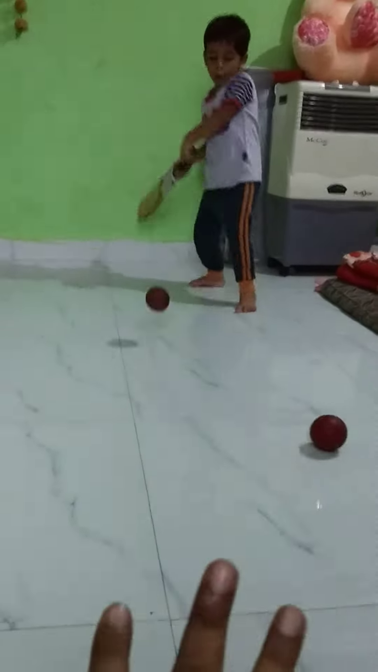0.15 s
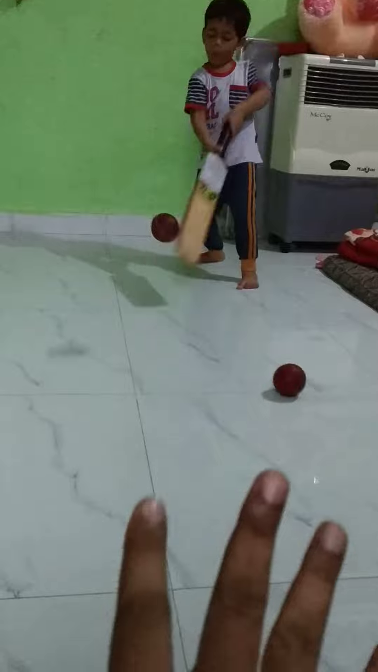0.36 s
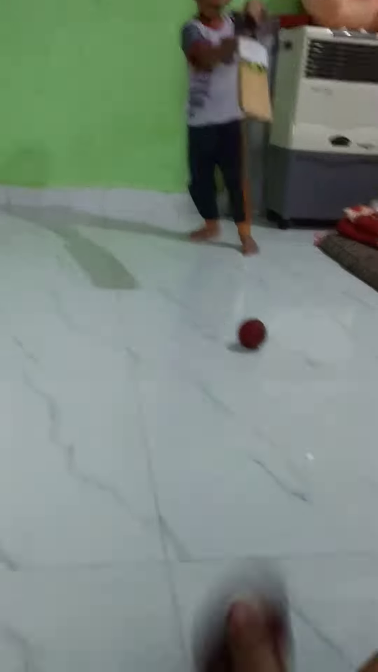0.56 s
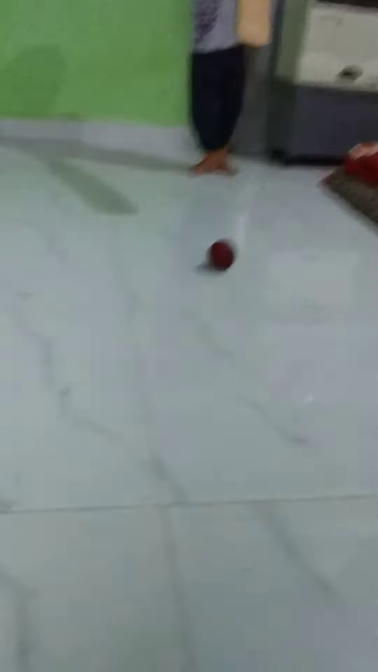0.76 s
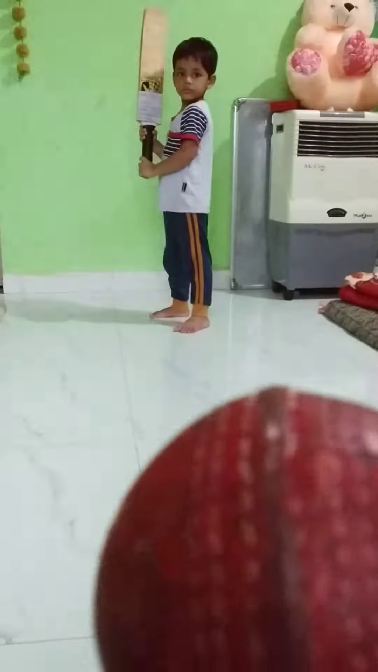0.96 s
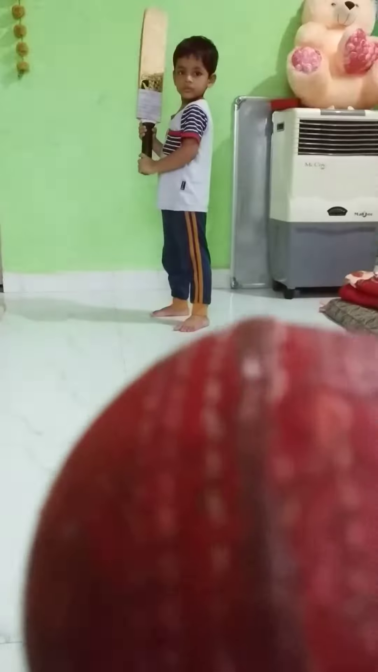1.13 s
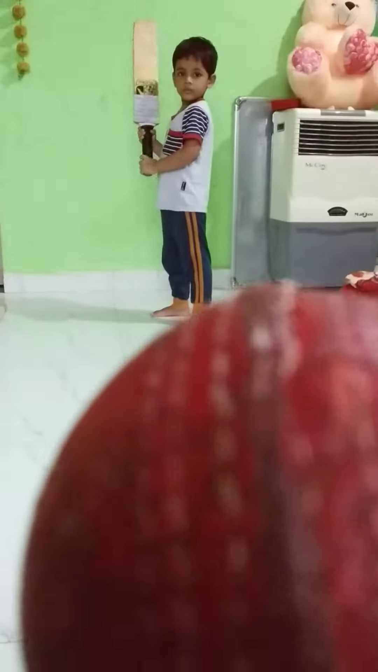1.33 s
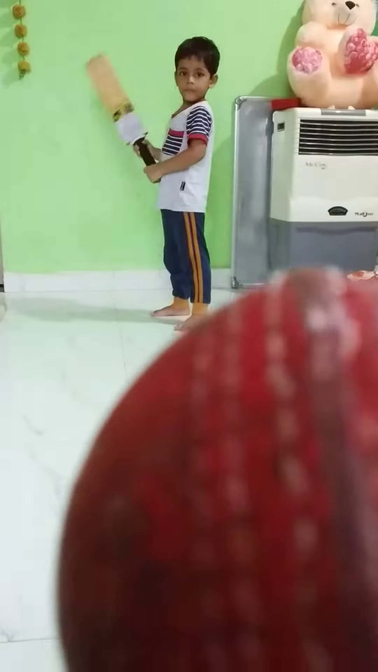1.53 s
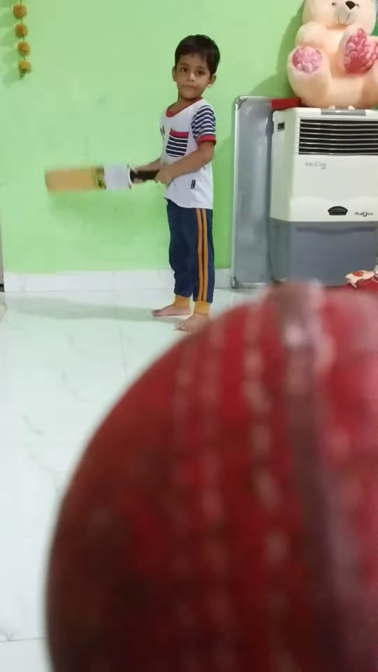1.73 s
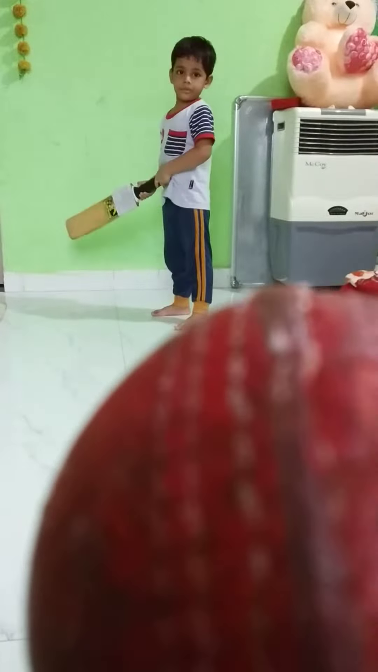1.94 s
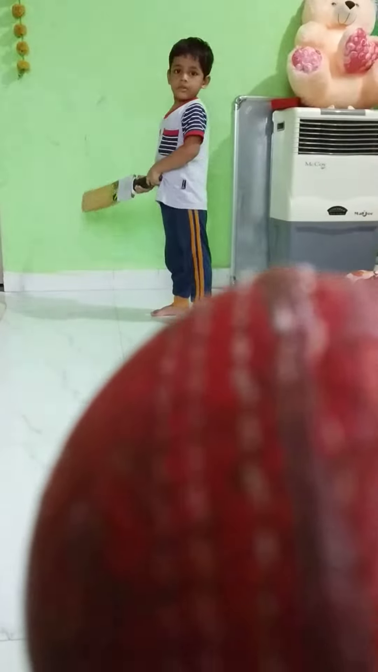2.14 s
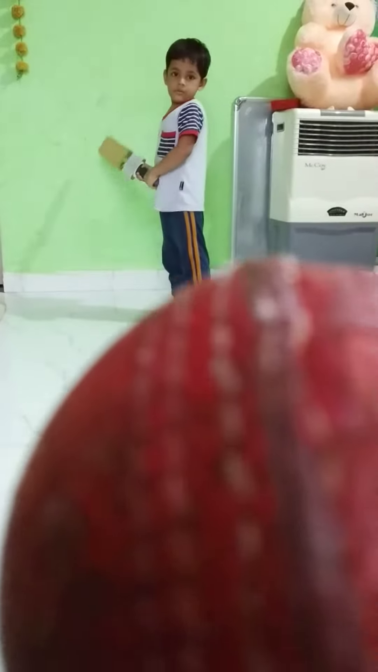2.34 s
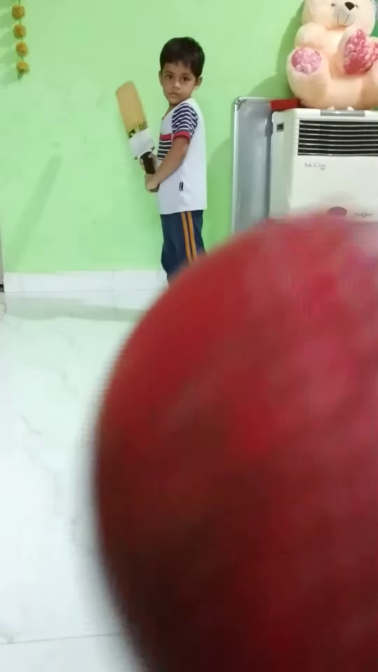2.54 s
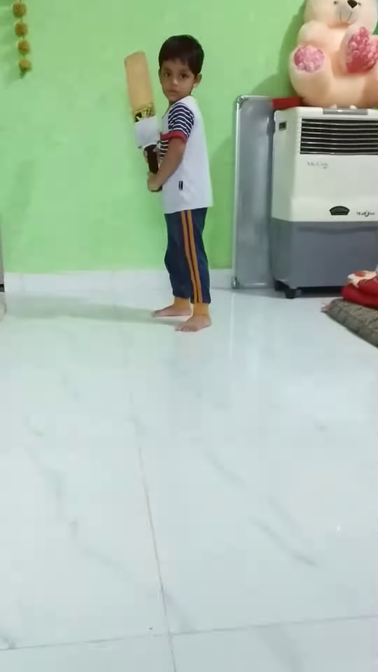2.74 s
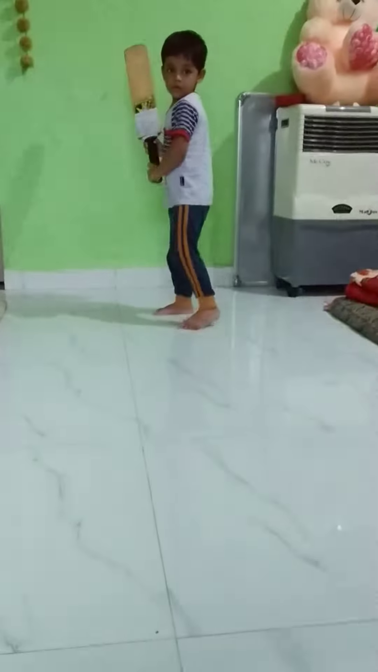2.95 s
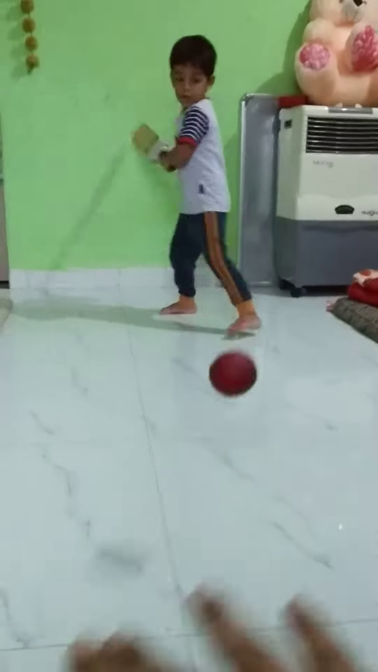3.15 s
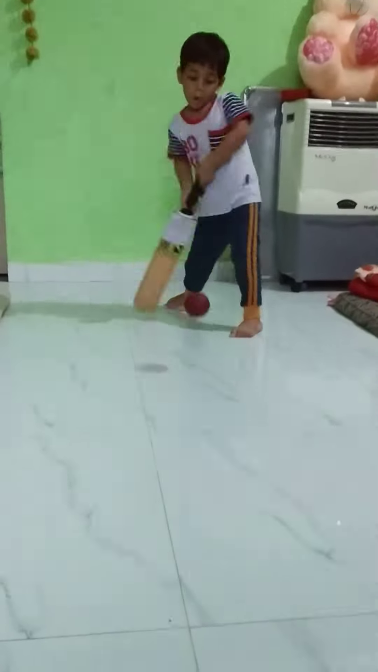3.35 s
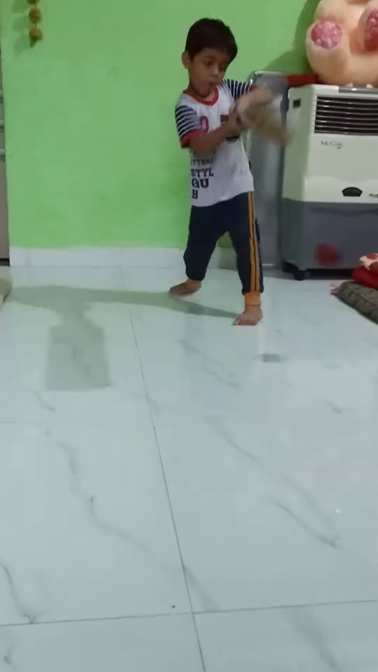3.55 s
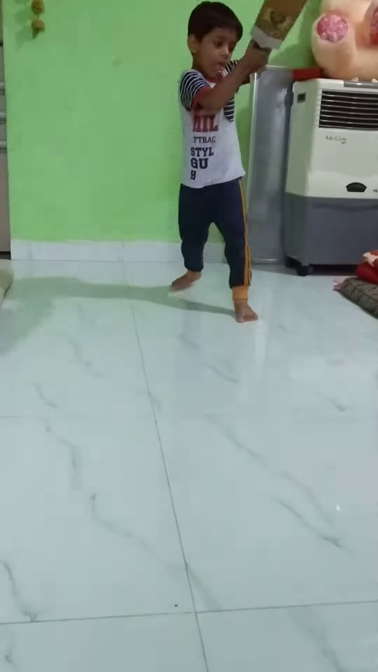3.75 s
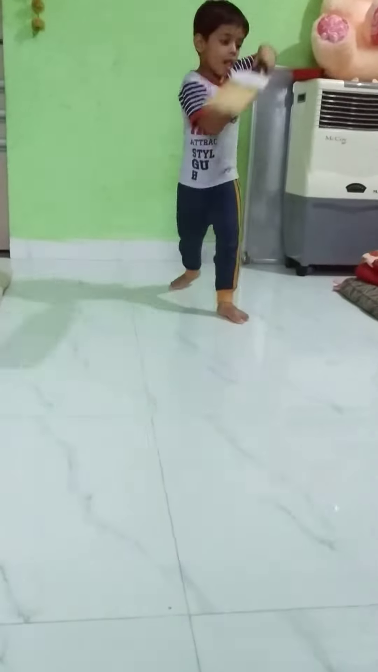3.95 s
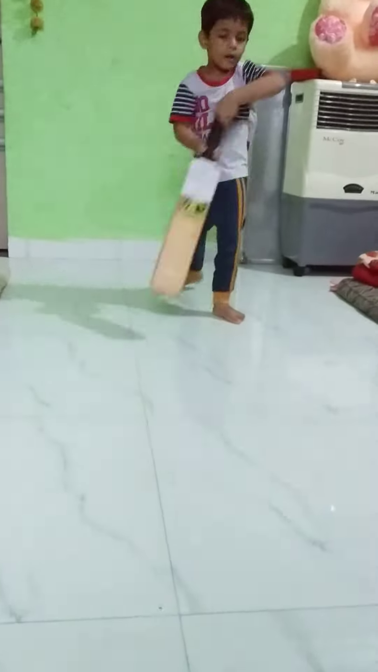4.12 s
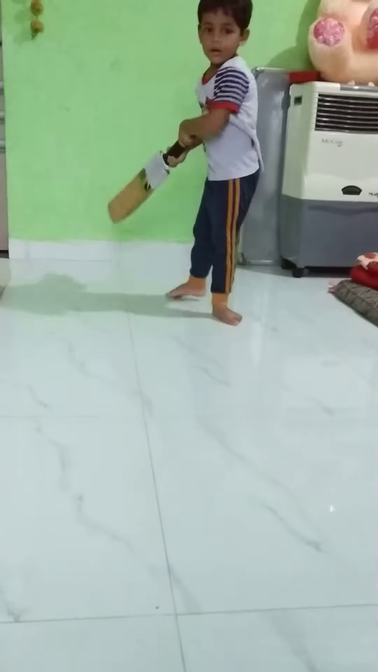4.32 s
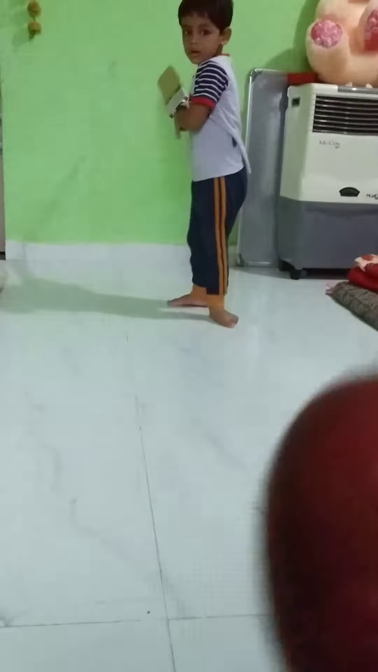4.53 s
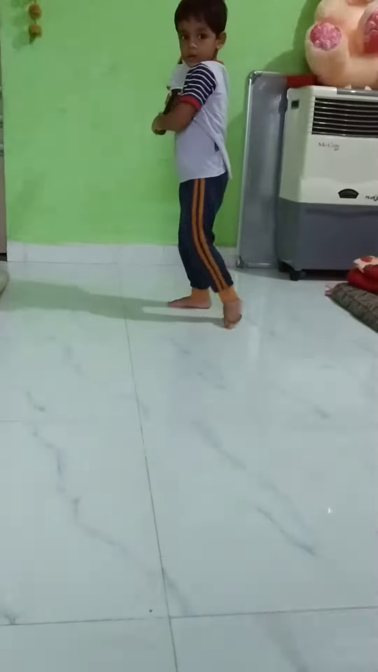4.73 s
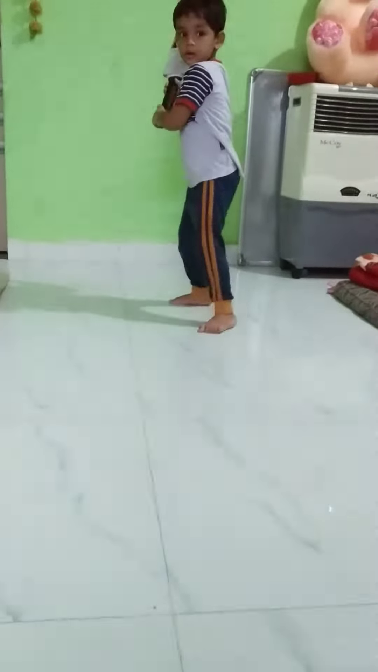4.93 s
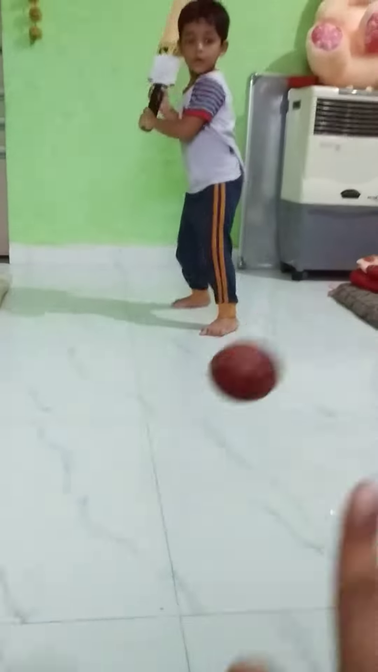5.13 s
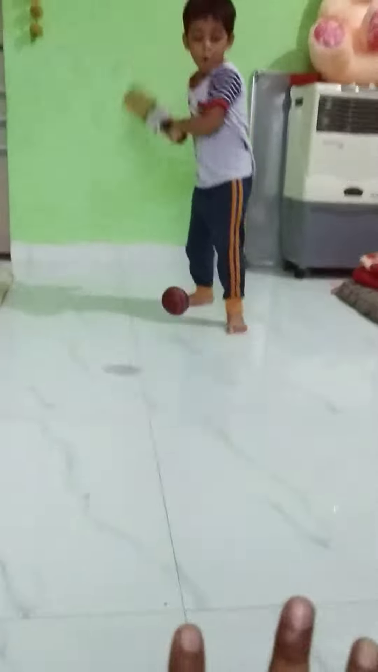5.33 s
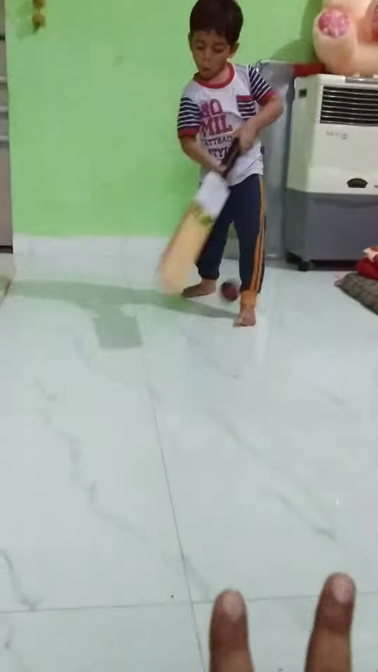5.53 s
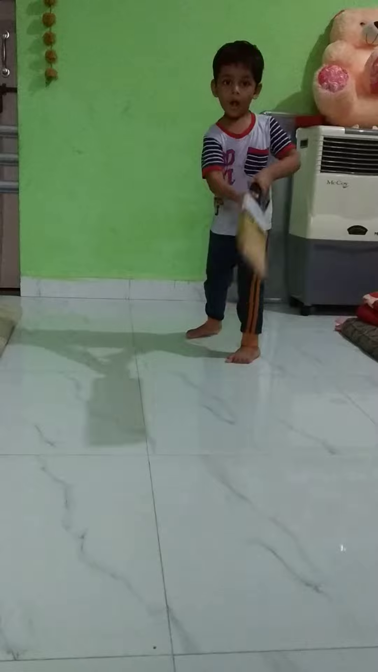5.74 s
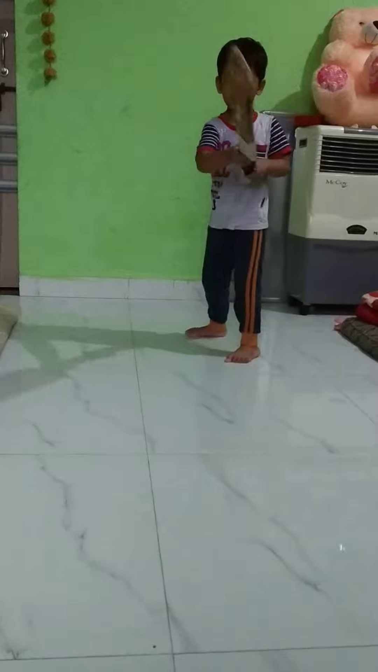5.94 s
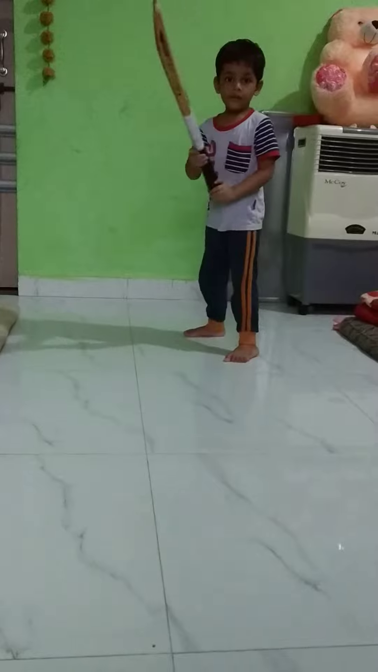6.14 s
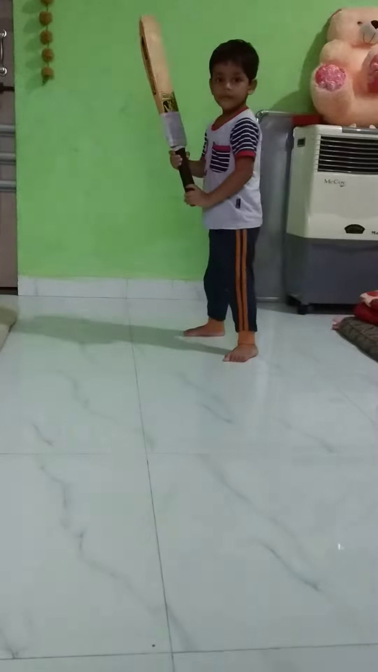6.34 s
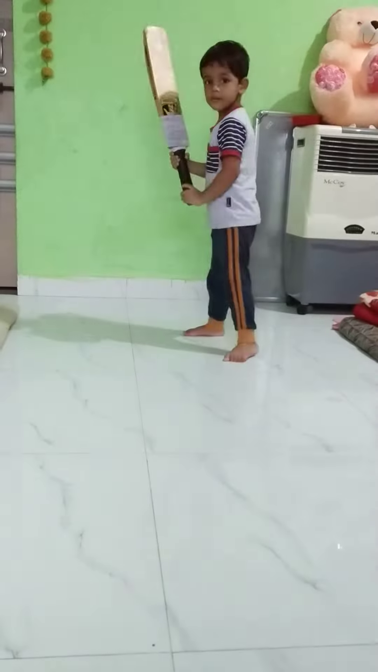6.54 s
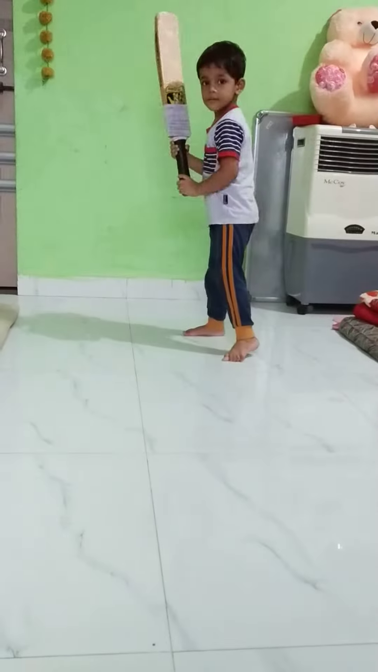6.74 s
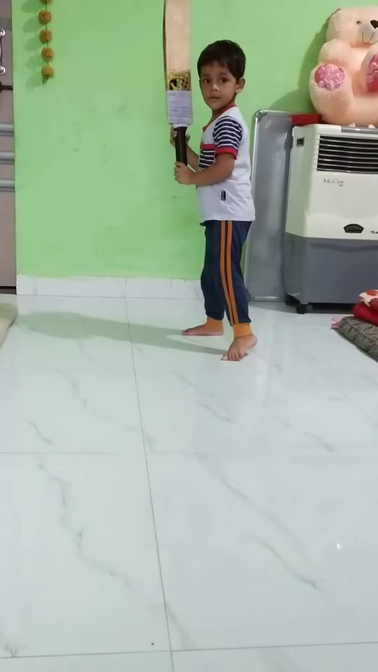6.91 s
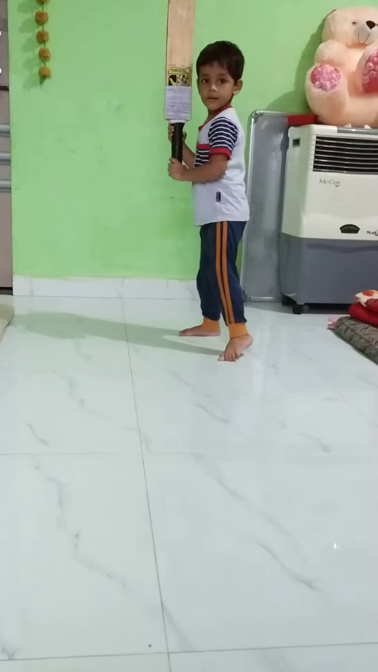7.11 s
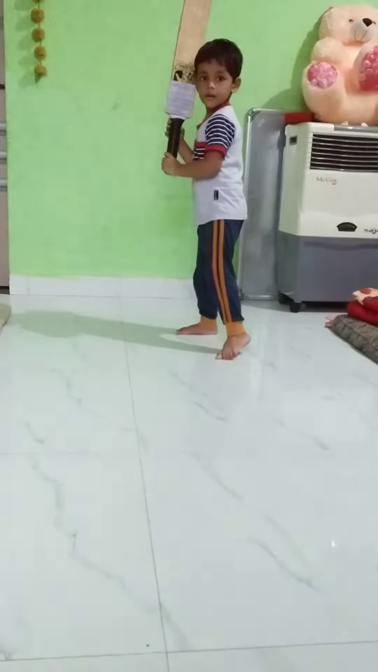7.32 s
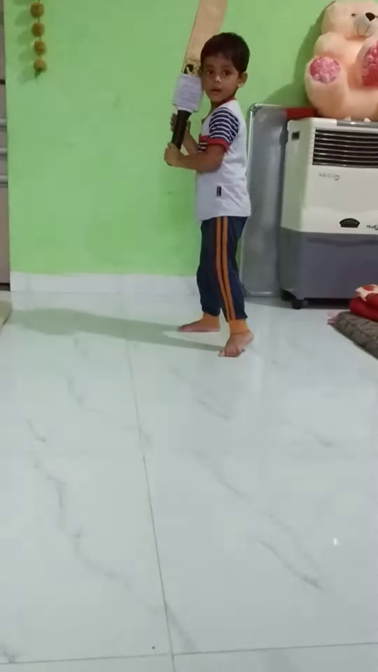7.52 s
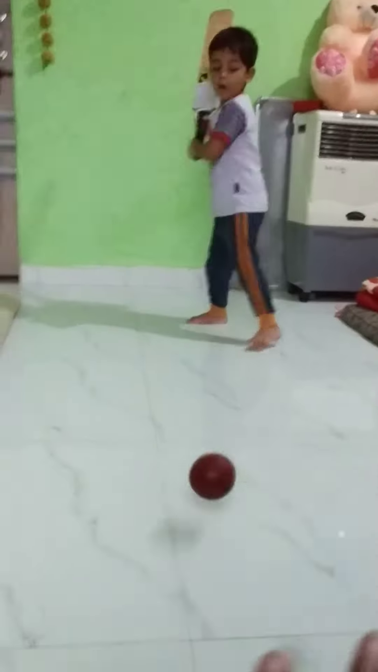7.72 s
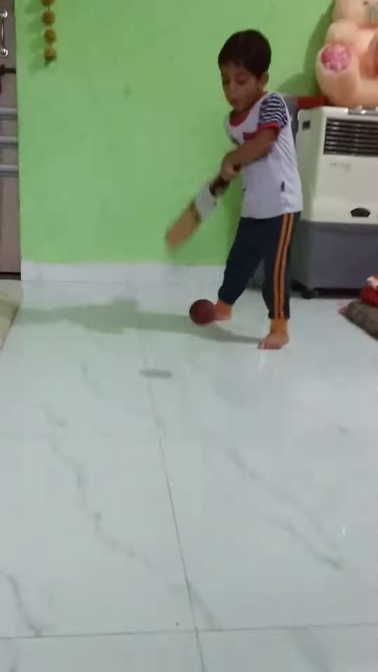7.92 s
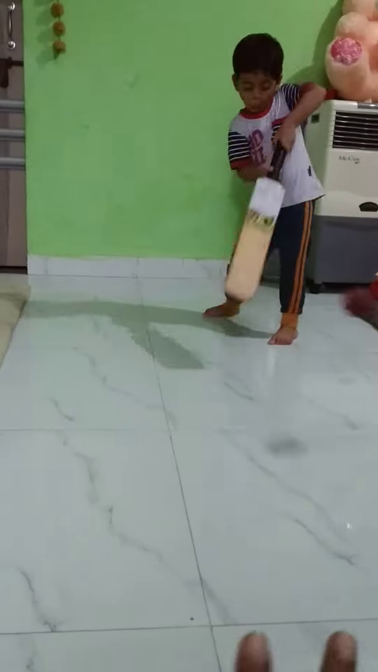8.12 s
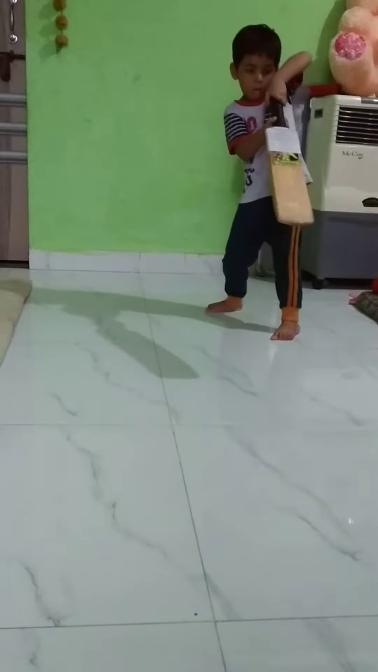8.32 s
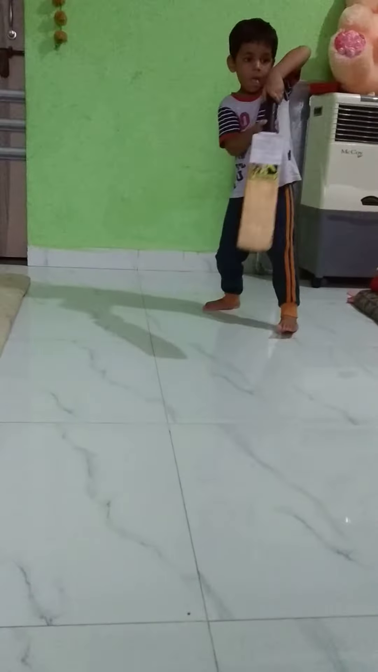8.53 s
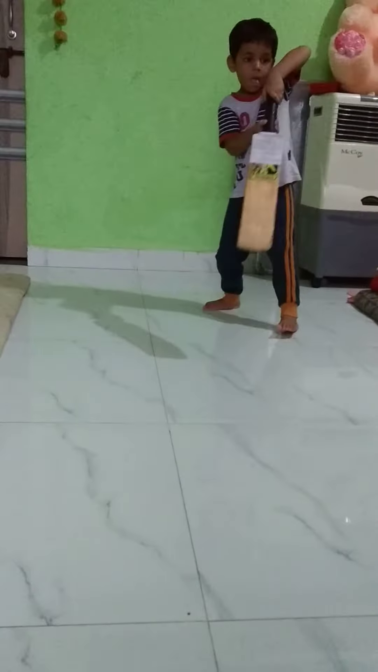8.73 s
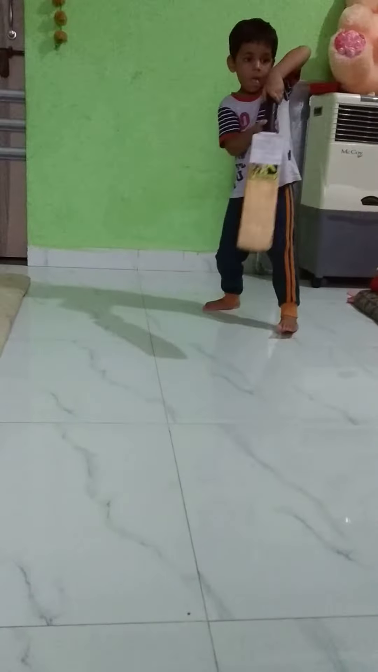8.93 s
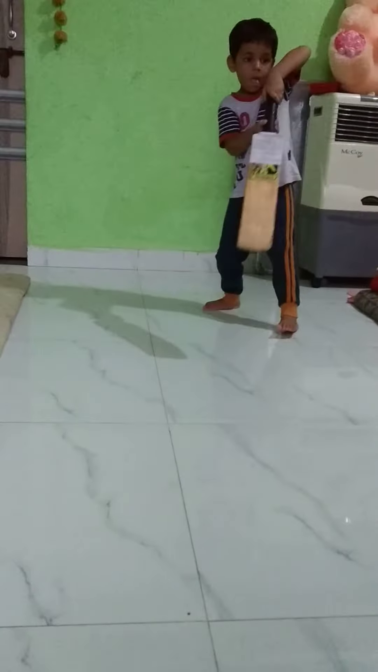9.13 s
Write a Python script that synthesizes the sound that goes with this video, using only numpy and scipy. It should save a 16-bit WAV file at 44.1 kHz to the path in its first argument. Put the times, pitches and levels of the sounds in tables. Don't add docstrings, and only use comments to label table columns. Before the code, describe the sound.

A hard leather ball knocks hollowly on a tiled floor and cracks off a wooden bat, then slams a door, over fan hum.

```python
import sys
import numpy as np
from scipy import signal
from scipy.io import wavfile

SR = 44100
rng = np.random.default_rng(int(sys.argv[2]) if len(sys.argv) > 2 else 0)


def nominal_scale(level):
    x = np.asarray(level, float) / 20
    return 10 ** x


def store_wav(level_fs):
    pcm = np.round(np.clip(np.atleast_2d(level_fs), -1, 1) * 32767)
    wavfile.write(sys.argv[1], SR, pcm.T.astype(np.int16))


N = 408807

# frequency in Hz, level in dB re blow, t60 in seconds.
SLAB_MODES = [(65.7, -18, 0.46), (108, -70, 0.97)]
# frequency in Hz, width in Hz, level in dB.
TILE_RESONANCES = [(1620, 337, -16.5), (2370, 2020, -1.5), (4720, 1200, -11.5)]


def rms_one(x):
    return x / np.sqrt(np.mean(x ** 2) + 1e-20)


def at_hz(points, hz):
    table_hz, value = np.array(points)[:, :2].T
    return np.interp(np.log(hz), np.log(table_hz), value)


def drift(rate):
    step = 40
    r = np.exp(-2 * np.pi * rate * step / SR)
    white = rng.standard_normal(N // step + 2002)
    slow = signal.lfilter([1], [1, -2 * r, r * r], white)[2000:]
    return np.interp(np.arange(N) / step, np.arange(len(slow)), rms_one(slow))


def ring(push, hz, t60):
    r = nominal_scale(-60 / (t60 * SR))
    w = 2 * np.pi * hz / SR
    return signal.lfilter([0, np.sin(w)], [1, -2 * r * np.cos(w), r * r], push + 1e-18)


def lift(x, hz, width_hz, db):
    r = np.exp(-np.pi * width_hz / SR)
    poles = [1, -2 * r * np.cos(2 * np.pi * hz / SR), r * r]
    return x + nominal_scale(db) * signal.lfilter([(1 - r * r) / 2, 0, (r * r - 1) / 2], poles, x)


def bandpass(order, low, high, x):
    return signal.sosfilt(signal.butter(order, [low, high], "band", fs=SR, output="sos"), x)


def highpass(hz, x):
    return signal.sosfilt(signal.butter(2, hz, "high", fs=SR, output="sos"), x)


def stereo_bands(size):
    # frequency in Hz, left-right correlation.
    likeness = [(26, 0.59), (75, 1), (290, 0.9), (640, -0.23), (1410, 0.18), (3100, -0.3), (6820, 0.23),
                (15000, -0.2)]
    # frequency in Hz, left minus right in dB.
    left_lift = [(60, 1.5), (200, -0.5), (380, 2), (700, 0), (2380, 2), (4400, -2.5), (8120, 6.5),
                 (15000, 13)]
    edges_hz = 20 * 2 ** np.arange(0, 9.8, .5)
    white = rng.standard_normal((2, 2, size))
    for k, (low, high) in enumerate(zip(edges_hz, edges_hz[1:])):
        mid, side = bandpass(2, low, high, white[k % 2])
        hz = np.sqrt(low * high)
        alike = np.clip(at_hz(likeness, hz), -1, 1)
        lean = nominal_scale(at_hz(left_lift, hz) / 2 * np.array([[1], [-1]]))
        yield hz, lean * (np.sqrt(1 + alike) * mid + np.sqrt(1 - alike) * side * [[1], [-1]])


def fan():
    # frequency in Hz, spectral density in dB per Hz.
    spectrum = [(25, -0.5), (68, 1), (120, -22), (300, -7.5), (560, -15.5), (1700, -18.5), (5000, -26.5),
                (14000, -34.5)]
    fan_db, flicker_db = -35.5, .9
    air = 0
    for hz, band in stereo_bands(size=N):
        air = air + nominal_scale(at_hz(spectrum, hz) + flicker_db * drift(14)) * band
    return nominal_scale(fan_db) * rms_one(air)


def draught():
    # middle in seconds, half length in seconds, level in dB.
    gusts = [
        (0.15, 0.8, -28.5),
        (1.543, 0.28, -37),
        (2.83, 0.092, -24),
        (3.264, 0.21, -26),
        (3.774, 0.039, -26.5),
        (4.844, 0.052, -32.5),
        (5.394, 0.32, -28),
        (6.3, 0.46, -36),
        (7.644, 0.45, -50),
        (8.64, 0.21, -16.5),
    ]
    t = np.arange(N) / SR
    gain = nominal_scale(-43.5)
    for s, half, db in gusts:
        gain = gain + nominal_scale(db) * np.exp(-((t - s) / half) ** 2)
    shared, left, right = rng.standard_normal((3, N))
    low = bandpass(2, 22, 105, [shared + 2.4 * left, shared + 1.7 * right])
    return gain * nominal_scale(-7.0 + 1.6 * drift(23)) * rms_one(low)


def contact(hz, ring_hz, slap_hz, slap_db, crack_db, knock_t60, ring_db, dull, body, surface):
    click = (np.arange(SR // 8) == 0) * -1.0
    push = ring(click, 1.267 * hz, 0.011)
    knock = ring(push, hz, knock_t60)
    knock += nominal_scale(9.0) * ring(push, 1.34 * hz, knock_t60 * 0.24)
    knock += nominal_scale(-3.0) * ring(push, 2.24 * hz, knock_t60 * 0.36)
    slap = bandpass(4, 0.45 * slap_hz, 1.63 * slap_hz, click)
    slap = slap / np.abs(slap).max()
    for f, width_hz, db in body:
        slap = lift(slap, f, width_hz, db)
    crack = highpass(1300, click)
    crack = signal.lfilter([1 - dull], [1, -dull], crack)
    for f, width_hz, db in surface:
        crack = lift(crack, f, width_hz, db)
    whole = knock / np.abs(knock).max() - nominal_scale(ring_db) * ring(click, ring_hz, 0.013)
    whole += nominal_scale(slap_db + 2.5) * slap + nominal_scale(crack_db + 21.5) * crack
    return highpass(.47 * hz, whole)


def blows(table, bands, knock_t60, slap_hz, force_db, wet_db, ring_db, snap_db, dull=0.64,
          panel=(), body=(), surface=TILE_RESONANCES, firm_db=-10):
    # frequency in Hz, t60 in seconds.
    room_decay = [(60, 0.13), (150, 0.4), (300, 0.24), (700, 0.26), (1500, 0.27), (4000, 0.26),
                  (9000, 0.28), (14000, 0.29)]
    delay_s, first_echo_s = .002, 0.0013
    room_db, early_db, early_s = -3, 1.5, 0.019
    wall_s, wall_db = 0.01, -9
    bunch_db, bunch_fade_s, bunches_per_s = 2.5, .03, 110
    brighter_oct_per_db = .08
    port_lag = 5
    size = SR * 3 // 4
    t = np.arange(size) / SR
    out = np.zeros((2, N + 2 * size))
    build = 1 - np.exp(-(t / first_echo_s) ** 2)
    decays = [build * nominal_scale(-60 * t / at_hz(room_decay, hz)) for hz, band in bands]
    bunches = drift(bunches_per_s)
    for s, knock_db, hz, slap_db, crack_db in table:
        skip = rng.integers(size)
        part = slice(skip, skip + size)
        noise = sum(band[:, part] for f, band in bands[-6:])
        echoes = sum(band[:, part] * d for (f, band), d in zip(bands, decays))
        echoes *= nominal_scale(bunch_db * bunches[part] * np.exp(-t / bunch_fade_s))
        echoes *= nominal_scale(room_db + wet_db - 32.5 + early_db * np.exp(-t / early_s))
        echoes[:, round(wall_s * SR * rng.uniform(.9, 1.1))] += nominal_scale(wall_db)
        echoes[0, 0] += 1
        echoes[1, port_lag:port_lag + 3] += [.3, .4, .3]
        octaves = brighter_oct_per_db * np.clip(slap_db - firm_db, -6, 14)
        direct = contact(hz, slap_hz, slap_hz * 2 ** octaves, slap_db, crack_db,
                         knock_t60, ring_db, np.clip(dull, 0, .9), body, surface)
        heard = signal.fftconvolve(echoes, direct[None], axes=1)[:, :size]
        heard += nominal_scale(crack_db + snap_db - 60 * t / 0.021) * noise
        for f, db, t60 in panel:
            heard += nominal_scale(db) * ring((t == 0) * -1.0, f, t60)
        at = round((s + delay_s) * SR)
        out[:, at:at + size] += nominal_scale(knock_db + force_db) * heard
    return out[:, :N]


def ticks(bands):
    # start in seconds, knock in dB, knock pitch in Hz, slap and crack in dB re knock.
    touches = [
        (0.552, -27, 412, -29, 6.5),
        (3.187, -30, 297, 0, -6),
        (4.982, -39, 368, -15, -3),
    ]
    # frequency in Hz, width in Hz, level in dB.
    seam = [(2100, 450, 11), (4250, 450, 12), (7700, 700, 12)]
    return blows(touches, bands, 0.023, slap_hz=1600, force_db=-5.0, wet_db=8.5, ring_db=-25,
                 snap_db=12.0, surface=seam)


def door_slam(bands):
    # start in seconds, knock in dB, knock pitch in Hz, slap and crack in dB re knock.
    hits = [
        (8.423, 0, 149, -9, -6),
        (8.443, -20, 183, 1, -1),
        (8.463, -12.5, 98, 2, -0.5),
        (8.490, -9, 132, -2.5, -9),
    ]
    # frequency in Hz, level in dB re blow, t60 in seconds.
    door_modes = [(56.4, -16, 0.62), (82, -34, 0.4), (126.5, -5.5, 0.35), (161, -8, 0.26), (202, -33, 0.13),
                  (253, -19.5, .3)]
    return blows(hits, bands, 0.0042, slap_hz=605, force_db=16.5, wet_db=9.5, ring_db=-38,
                 snap_db=-3.5, dull=0.78, panel=door_modes, firm_db=1.5)


def bat_strokes(bands):
    # start in seconds, knock in dB, knock pitch in Hz, slap and crack in dB re knock.
    strokes = [
        (0.258, -15, 387, -2.5, -5),
        (3.407, -21.5, 357, 4.5, 0.5),
        (7.986, -17.5, 348, -1.3, -4),
    ]
    # frequency in Hz, width in Hz, level in dB.
    blade = [(812, 63, 7.5), (1073, 150, 2), (1402, 45, 6), (1816, 170, 7.5), (2060, 44, 6.5)]
    # frequency in Hz, width in Hz, level in dB.
    face = [(4730, 2700, -11)]
    return blows(strokes, bands, 0.016, slap_hz=1044, force_db=22.5, wet_db=6.0, ring_db=-10.5,
                 snap_db=-2.5, body=blade, surface=face, firm_db=4.3)


def loose_tile_bounces(bands):
    # start in seconds, knock in dB, knock pitch in Hz, slap and crack in dB re knock.
    soft = [
        (0.011, -17.5, 294, -6.5, -15),
        (6.266, -10.5, 279, -5.5, -19.5),
    ]
    # frequency in Hz, width in Hz, level in dB.
    loose_tile = [(1500, 400, 5), (2170, 130, 17)]
    return blows(soft, bands, 0.035, slap_hz=612, force_db=2.5, wet_db=13.0, ring_db=-4.0,
                 snap_db=-14, dull=0.55, firm_db=-5.5, surface=loose_tile)


def near_bounces(bands):
    # start in seconds, knock in dB, knock pitch in Hz, slap and crack in dB re knock.
    close = [
        (0.702, -6, 292, -15, -24.5),
        (7.717, -7.5, 296, -11, -14.5),
        (8.32, -2.5, 230, -9.5, -10.5),
        (9.019, 1, 262, -8.5, -22),
    ]
    return blows(close, bands, 0.039, slap_hz=670, force_db=-2.5, wet_db=12.5, ring_db=-8.0,
                 snap_db=11.0, dull=0.31, panel=SLAB_MODES)


def bounces(bands):
    # start in seconds, knock in dB, knock pitch in Hz, slap and crack in dB re knock.
    landings = [(0.084, -12, 303, -14, -10.5), (0.599, -9, 330, -8, -10.5), (1.735, -14.5, 349, -7, -14),
                (3.212, -11, 291, 1.5, -14), (3.355, -16, 293, -13.5, -25), (5.232, -14.5, 288, -14, -12.5),
                (5.467, -10, 302, -9.5, -14.5), (5.516, -10.5, 365, -12, -15), (6.036, -16, 302, -16, -15),
                (6.437, -30, 253, -18.5, -13), (6.557, -35, 203, -33, -25), (1.806, -55, 404, -16, -20)]
    return blows(landings, bands, 0.039, slap_hz=648, force_db=7.5, wet_db=7, ring_db=-8.0,
                 snap_db=-3.5, dull=0.49, panel=SLAB_MODES)


def scene():
    bands = list(stereo_bands(size=2 * SR))
    ball = ticks(bands) + door_slam(bands) + bat_strokes(bands)
    ball += loose_tile_bounces(bands) + near_bounces(bands) + bounces(bands)
    return fan() + draught() + ball


def low_pass(x):
    return signal.sosfilt(signal.butter(12, 16830, fs=SR, output="sos"), x)


def record(dry):
    limit_db, squeeze = -3, 0.95
    release_db_per_s, attack_s = 317, 0.0014
    level_db = 20 * np.log10(np.abs(dry).max(axis=0) + 1e-9)
    ramp = release_db_per_s * np.arange(N) / SR
    held_db = np.maximum.accumulate(level_db + ramp) - ramp
    cut_db = squeeze * np.maximum(held_db - limit_db, 0)
    r = np.exp(-1 / (attack_s * SR))
    cut_db = signal.lfilter([1 - r], [1, -r], cut_db)
    cut_db = np.roll(cut_db, -40)
    clipped = np.clip(dry * nominal_scale(-cut_db), -.85, .85)
    top_cut = signal.cheby2(6, 40, 17000, fs=SR, output="sos")
    return low_pass(signal.sosfilt(top_cut, clipped))


dry = scene()
out = record(dry)
store_wav(out)
```